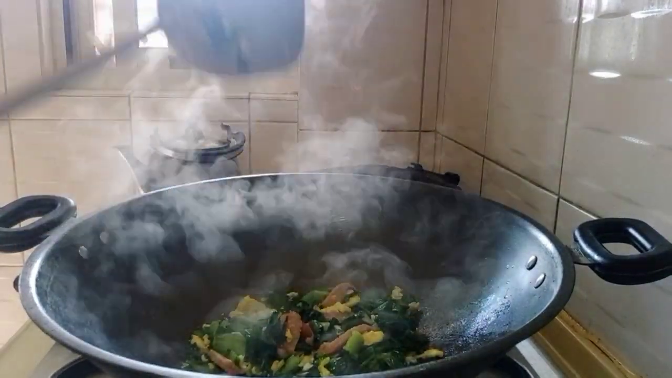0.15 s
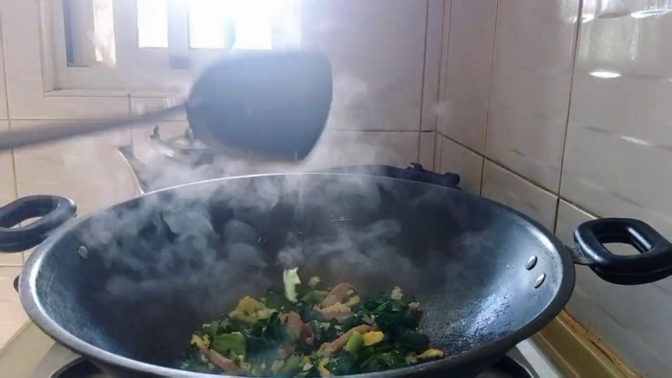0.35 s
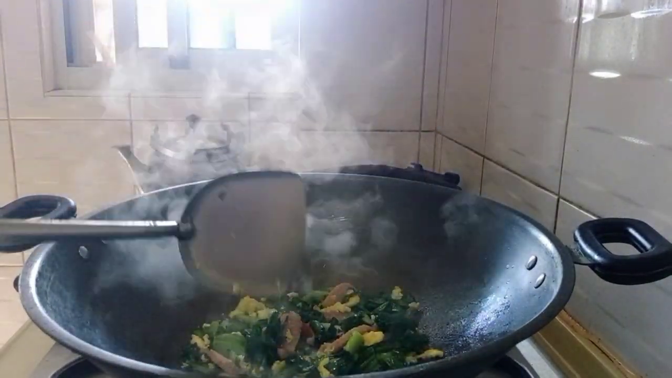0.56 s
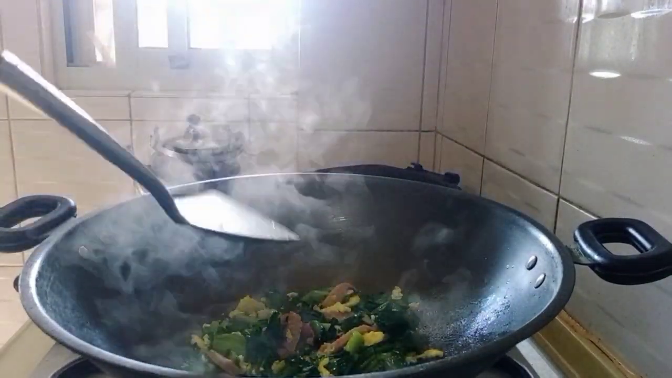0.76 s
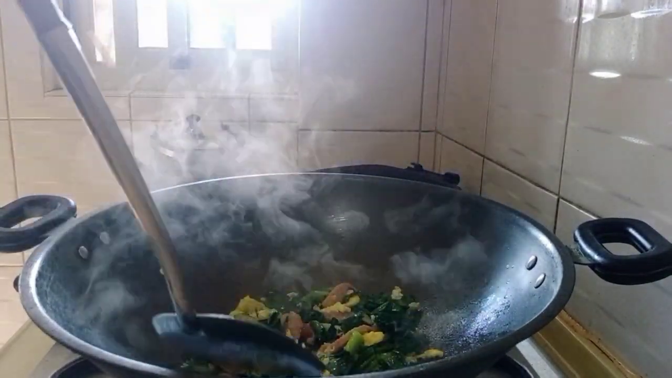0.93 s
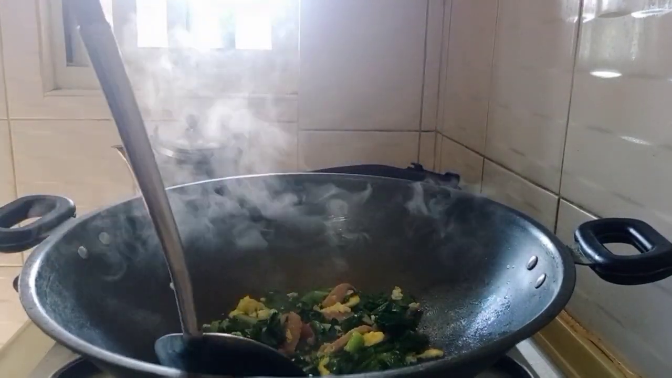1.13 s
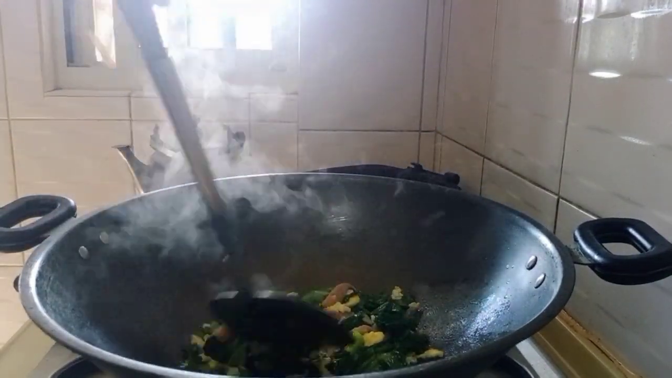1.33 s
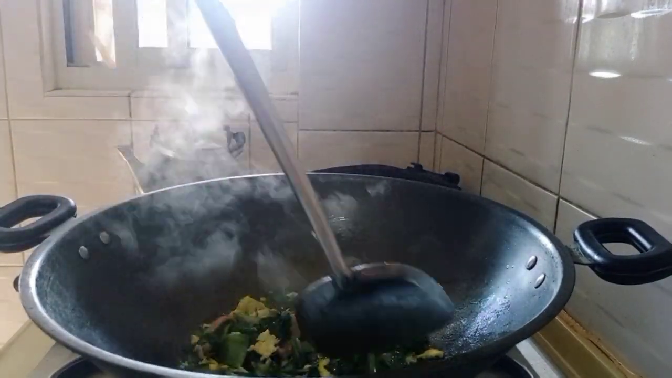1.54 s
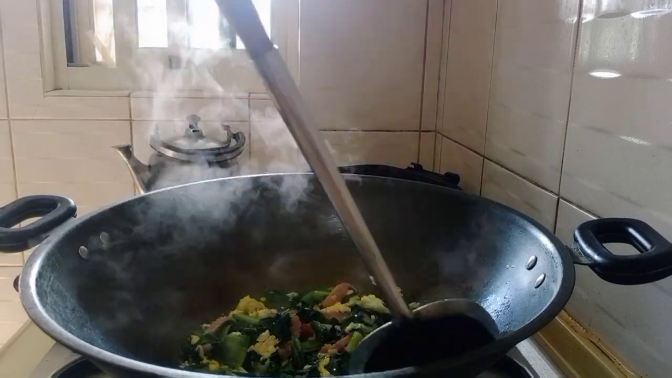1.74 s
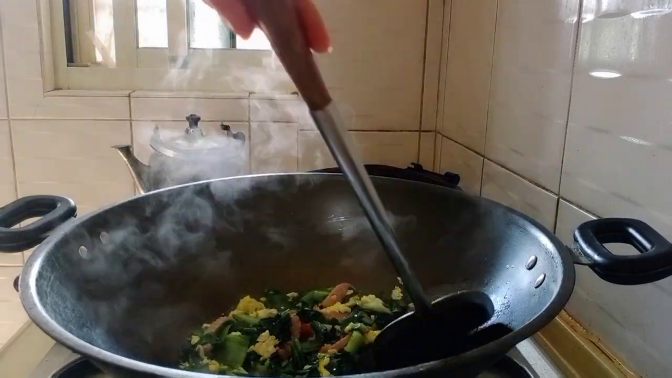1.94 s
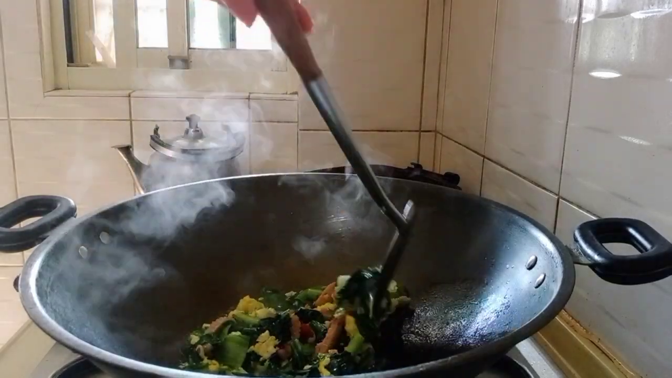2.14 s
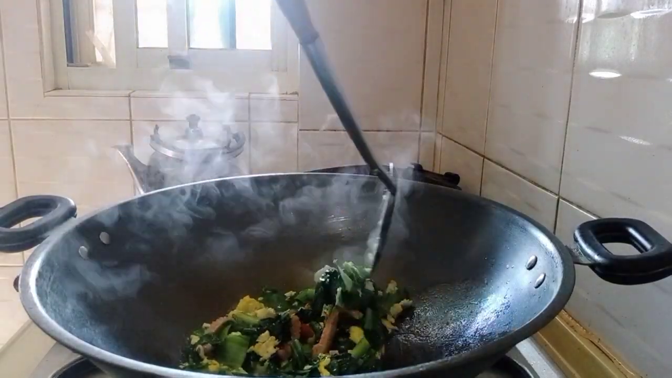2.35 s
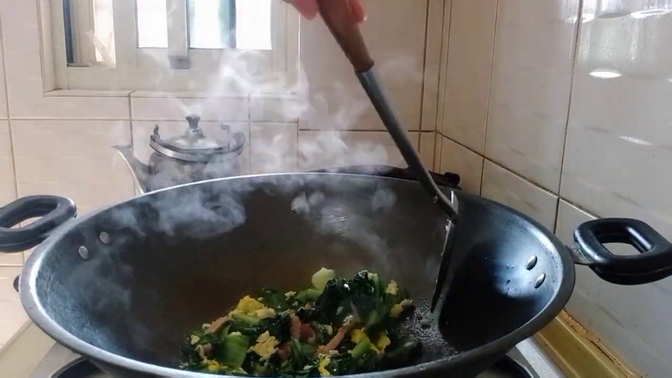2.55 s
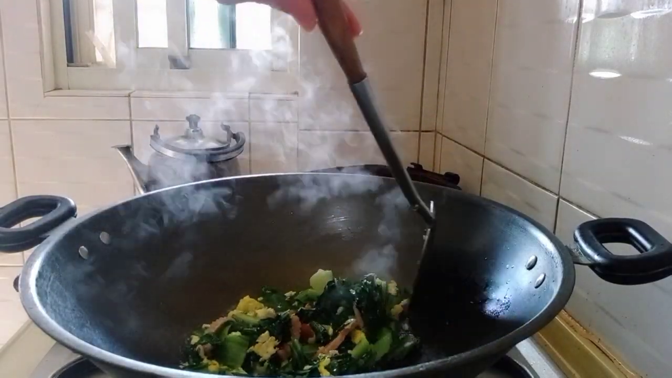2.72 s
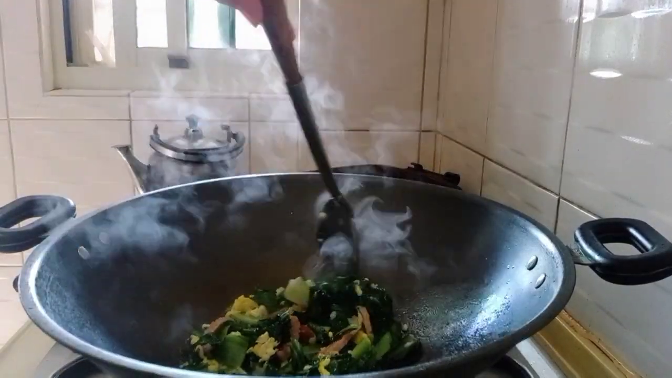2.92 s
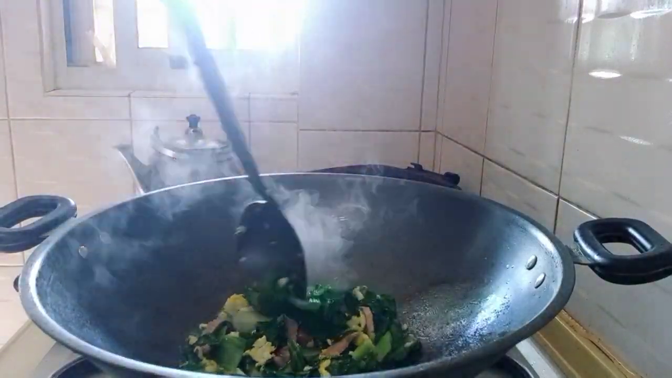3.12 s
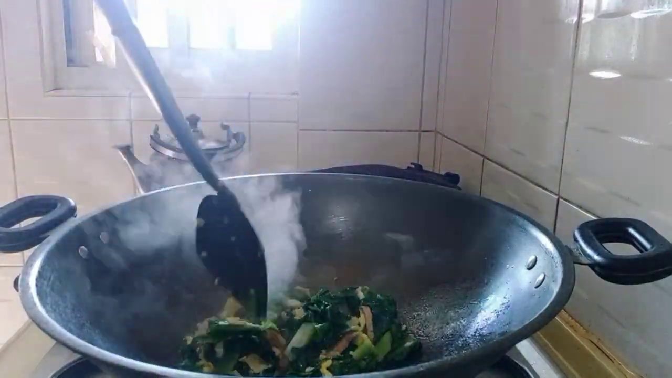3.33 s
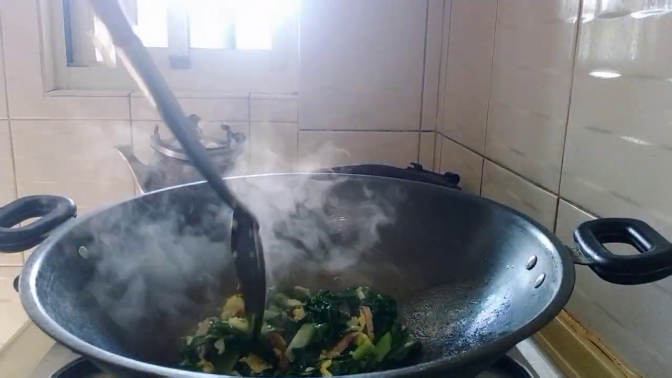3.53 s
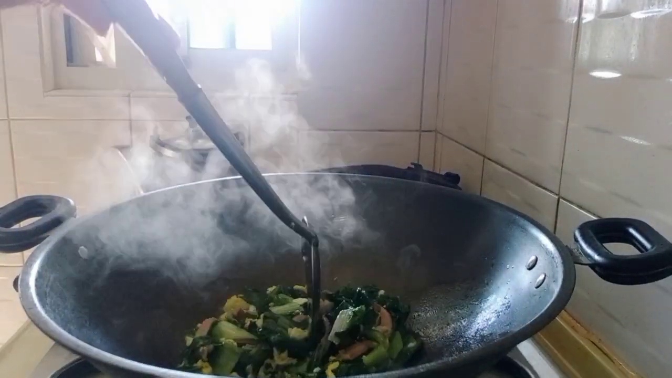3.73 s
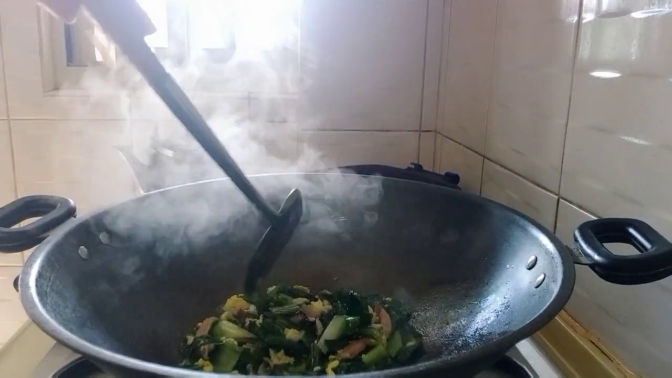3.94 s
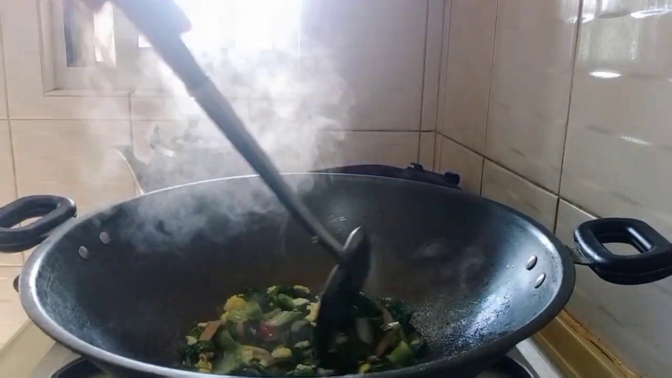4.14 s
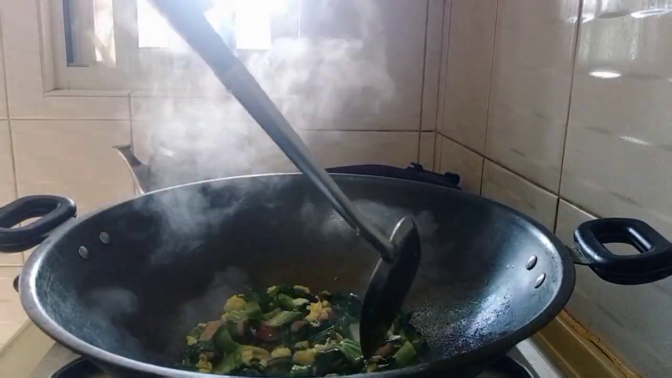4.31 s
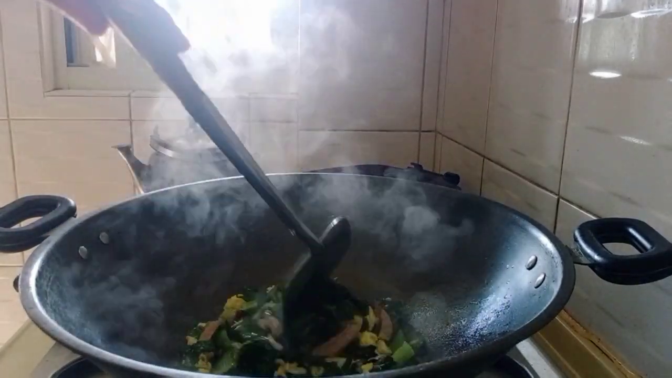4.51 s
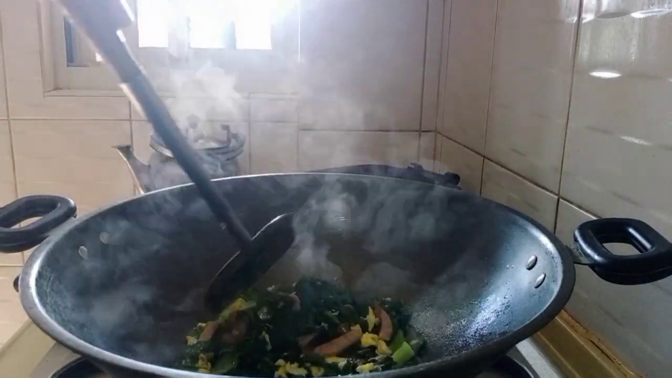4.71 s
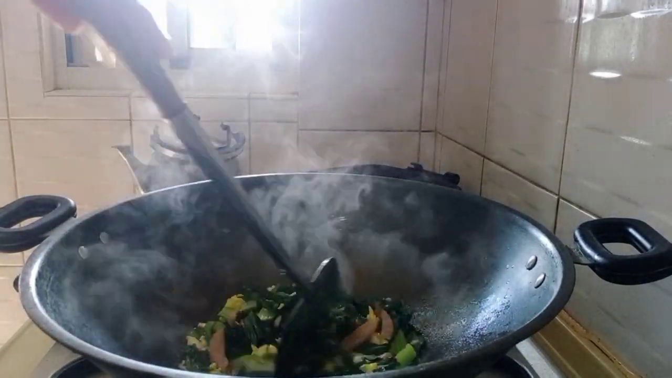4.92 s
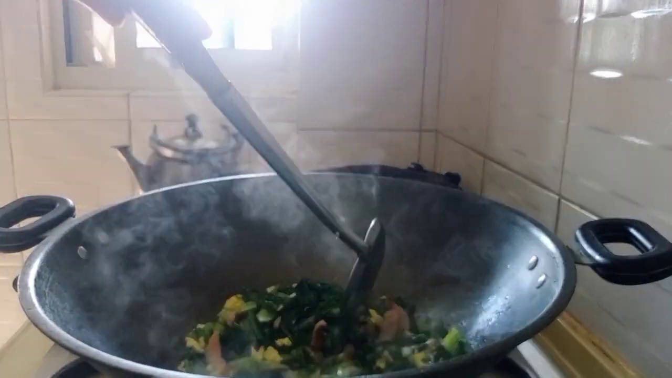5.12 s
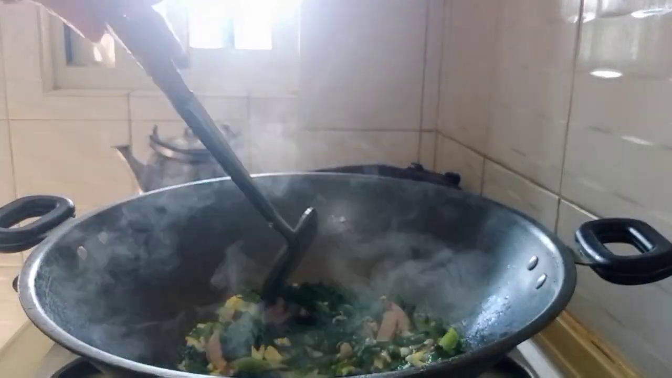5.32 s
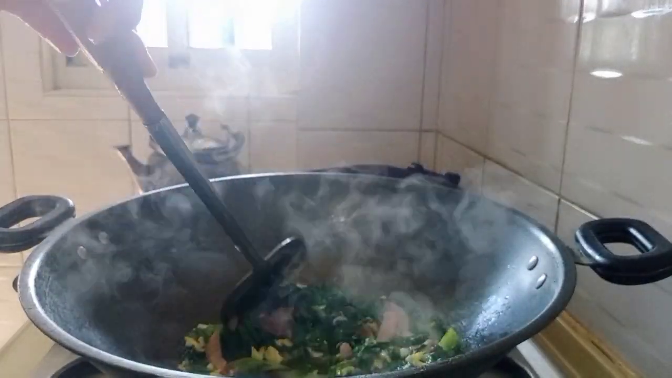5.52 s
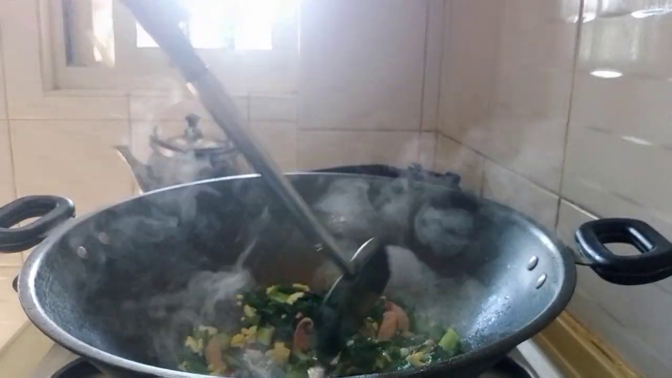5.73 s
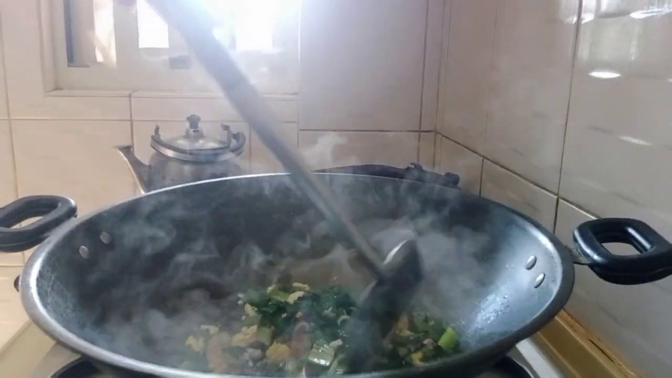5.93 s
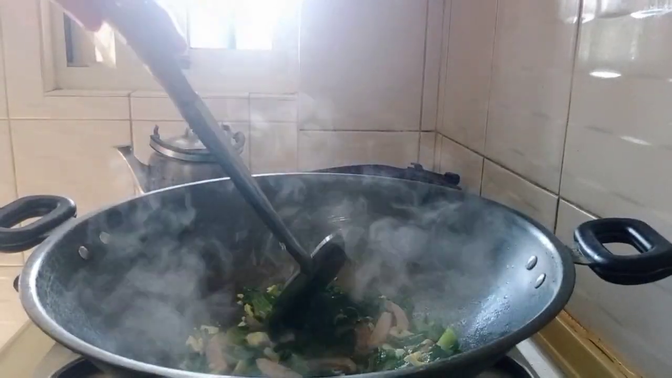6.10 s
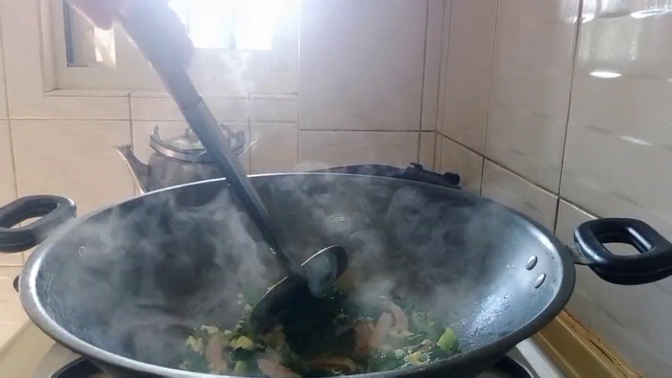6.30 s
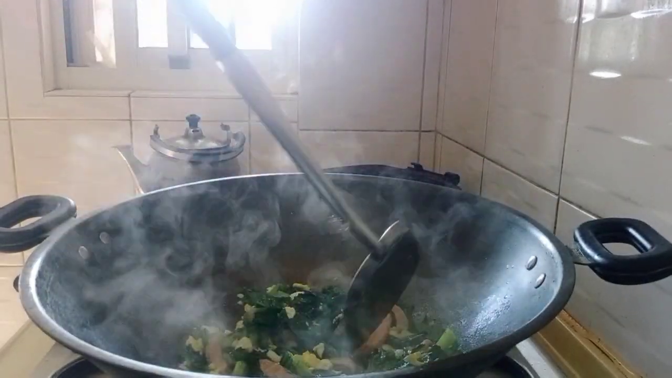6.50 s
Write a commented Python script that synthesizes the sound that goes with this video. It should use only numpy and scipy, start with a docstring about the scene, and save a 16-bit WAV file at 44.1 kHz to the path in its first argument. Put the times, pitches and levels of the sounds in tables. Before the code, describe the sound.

Vegetables sizzle steadily in a steel wok as a metal spatula clanks and scrapes the bowl, then the frying flares into a loud wet hiss.

```python
"""Vegetables fry in a steel wok, a short way from a single phone microphone in a small tiled kitchen.
Crackling noise makes the fizz and gurgle of steam bubbles, which flare up when fresh food meets the hot wall.
A steel spatula drags and knocks in three bouts, setting the bowl's modes ringing. Noise through resonances
gives brief soft rings, low from the blade in the food, higher at 5-6 s from gurgling bubbles, and two steam
whistles. Water drops spit as jumps of the fizz, and filtered noise is the faint burner."""
import sys
import numpy as np
from scipy import signal
from scipy.fft import rfft, irfft
from scipy.io import wavfile
from scipy.ndimage import uniform_filter1d, map_coordinates

SR = 44100
rng = np.random.default_rng(int(sys.argv[2]) if len(sys.argv) > 2 else 0)


def gain_from_db(level_db):
    """Convert decibel levels to linear amplitude factors (20 dB per decade)."""
    decades = np.asarray(level_db, float) / 20
    return 10 ** decades


def put_to_file(sound):
    """Save the sound as 16-bit audio at rate SR, in the file named by the first command-line argument."""
    columns = np.atleast_2d(sound).T  # one column per channel
    safe = np.clip(columns, -1, 1)
    whole_steps = np.round(safe * 32767)
    wavfile.write(sys.argv[1], SR, whole_steps.astype(np.int16))


N = 293706
TIME = np.arange(N) / SR


def level(x, db):
    """Scale to an rms level."""
    return x * gain_from_db(db) / np.sqrt(np.mean(x ** 2))


def band(x, hz, kind, order=2):
    """Butterworth filter."""
    return signal.sosfilt(signal.butter(order, hz, kind, fs=SR, output="sos"), x)


def colour(x, points):
    """Causal filter through (frequency [Hz], gain [dB]) points, from the cepstrum of the log gain."""
    hz, db = np.transpose(points)
    grid = np.maximum(np.fft.rfftfreq(2048, 1 / SR), 1)
    log_gain = np.interp(np.log(grid), np.log(hz), db) * np.log(10) / 20
    cepstrum = irfft(log_gain)
    # folding the second half onto the first gives minimum phase
    cepstrum[1:1024] *= 2
    cepstrum[1025:] = 0
    response = irfft(np.exp(rfft(cepstrum)))
    return signal.fftconvolve(x, response)[:len(x)]


def ring(x, hz, t60):
    """One mode that swells quickly, then decays; steady noise roughly keeps its level."""
    for t in (t60, 0.06 * t60):  # the slow decay, then the quick swell
        r = np.exp(-np.log(1000) / (t * SR))
        x = signal.lfilter([1 - r, 0, r - 1], [1, -2 * r * np.cos(2 * np.pi * hz / SR), r * r], x)
    return x / np.sqrt(1 - np.exp(-np.log(1000) / (t60 * SR)))


def walk(rate):
    """Random levels held 1 / rate s and slewed twice; spread near 1."""
    k = int(SR / rate)
    held = np.repeat(rng.standard_normal(N // k + 1), k)
    return 1.58 * uniform_filter1d(uniform_filter1d(held, k), k)[:N]


def crackle(share, spread_db):
    """Clicks on a share of the samples, most small and a few large, at unit rms."""
    size = gain_from_db(spread_db * rng.exponential(size=N)) * rng.standard_normal(N)
    return level(size * (rng.random(N) < share), 0)


def swell(s0, length, attack, release):
    """Rises to 1, holds for the length, dies away; all times in s."""
    after = TIME - s0
    return np.exp(np.minimum(after, 0) / attack - np.maximum(after - length, 0) / release)


def frying():
    """Tiny bubbles fizz; larger wet ones gurgle in narrow patches and shake the bowl."""
    # heat of the frying: (time [s], fizz level [dB], wet gurgle level [dB above the fizz])
    heat = [(0, -48.5, -12), (1.1, -48.5, -17), (1.9, -49, -10.5), (2.0, -50.5, -11.5), (2.7, -51, -9),
            (2.9, -46.5, 0), (3.15, -45.5, -4.5), (3.6, -48, -3.5), (4.02, -47, -6.5), (4.15, -45.5, -2.5),
            (4.6, -47.5, -8), (4.91, -47.5, -8), (5.0, -39, 0.5), (5.1, -37.5, 0), (5.2, -40, -2),
            (5.4, -43, 0.5), (5.8, -45.5, -5), (6.2, -47.5, -9), (6.66, -47.5, -8.5)]
    simmer_db = -49
    fine_lag_s = 0.15
    s, fizz_points, wet_points = np.transpose(heat)
    fizz_db, wet_db = np.interp(TIME, s, fizz_points), np.interp(TIME, s, wet_points)
    # the finest fizz and the deep gurgle gain on the fizz as the heat grows, the former a little late
    fine_db = 5 + 0.52 * (np.interp(TIME - fine_lag_s, s, fizz_points) - simmer_db)
    deep_db = -16 + 0.49 * (fizz_db - simmer_db)
    fizz = tiny_bubbles(fine_db)
    bubbles = crackle(0.3, 1.94)
    gurgle = wet_bubbles(bubbles, deep_db, wet_db)
    # bubbles leave the four lowest families still
    still = np.zeros(N)
    deep_force, wet_force = bubbles * gain_from_db(deep_db - 15), bubbles * gain_from_db(wet_db - 17.5)
    shaken = wok([still] * 4 + [deep_force] * 2 + [wet_force], unsteady_db=3.44)
    simmering = gain_from_db(fizz_db + 0.38 * walk(20)) * (bowl_echo(fizz + gurgle) + shaken)
    return simmering + spits(fizz)


def tiny_bubbles(fine_db):
    """Dense small bursts fizz; the finest, in the top treble, have a level of their own."""
    # colour of the fizz: (frequency [Hz], relative gain [dB])
    fizz_colour = [(600, -39.5), (1000, -32), (1460, -7), (2500, -18.5), (3450, -6), (4400, -5),
                   (5080, -15), (5350, -1), (6800, 2), (8000, -5.5), (9200, -18.5), (11300, -13),
                   (12600, -3), (14000, 6), (15600, 3.5)]
    split_hz = 9500
    fizz = colour(crackle(0.54, 0.79), fizz_colour)
    coarse = level(band(fizz, split_hz, "low", order=4), 0)
    fine = level(band(fizz, split_hz, "high", order=4), 0)
    return coarse + gain_from_db(fine_db) * fine


def wet_bubbles(bubbles, deep_db, wet_db):
    """Larger bubbles gurgle; each narrow slice of the spectrum comes and goes on its own."""
    # colour of the gurgle: (frequency [Hz], relative gain [dB])
    gurgle_colour = [(150, -46.5), (250, -23.5), (529, -21.5), (623, -8), (714, -27.5), (951, -23.5),
                     (1250, -9.5), (1990, -21), (2130, -9), (2370, -10.5), (3930, 6.5), (6500, 1.5),
                     (8450, -30), (14300, -120)]
    edges = np.arange(240, 6600, 110)  # Hz
    patches = np.zeros(N)
    for low, high in zip(edges, edges[1:]):
        patches += gain_from_db(6.3 * np.tanh(walk(16))) * band(bubbles, [low, high], "band")
    patches = colour(patches, gurgle_colour)
    deep = level(band(patches, 2340, "low", order=4), 0)
    wet = level(band(patches, 2160, "high", order=4), 0)
    return gain_from_db(deep_db) * deep + gain_from_db(wet_db) * wet


def bowl_echo(x):
    """The far wall of the bowl sends the mid treble back a moment later; the path shifts as the food moves."""
    echo_ms, echo_share = 1.302, 0.38
    lag = echo_ms * (1 + 0.029 * walk(5)) * SR / 1000  # samples
    mid_treble = signal.filtfilt(*signal.butter(1, [2800, 6200], "band", fs=SR), x)
    late = map_coordinates(mid_treble, [np.arange(N) - lag], order=3)
    return x + echo_share * late


def spits(fizz):
    """Drops of water spit out of the oil: the fizz jumps up for a few milliseconds."""
    # spitting drops: (time [s], level [dB before the 0.3 share])
    drops = [(0.609, -30.5), (5.3944, -36), (5.5084, -40), (5.6504, -33)]
    burst = np.zeros(N)
    for s0, db in drops:
        # the peak comes 2 ms after the listed time
        burst += gain_from_db(db) * np.exp(-np.abs(TIME - s0 - 0.002) / 0.0012)
    return 0.3 * burst * fizz


def wok(forces, unsteady_db):
    """The bowl's modes, each family driven by its own force; the moving contact wakes each mode unevenly."""
    # modes of the steel bowl: (frequency [Hz], gain [dB], decay t60 [s])
    modes = [(92.5, 1, 0.24), (147.6, -7, 0.56), (341.3, -18.5, 0.21), (438, -22, 0.095),
             (527, -10.5, 0.045), (590, -10.5, 0.15), (671, -16, 0.12), (809.7, -5.5, 0.14),
             (831.6, -8, 0.38), (1240, -15, 0.068), (1287, -11, 0.13), (1490, -18.5, 0.076),
             (1573, -18, 0.095), (1720, -18, 0.048), (1868.5, -7, 0.14), (1900, -4, 0.11),
             (2070, -17, 0.39), (3158, -9.5, 0.2), (3580, -3, 0.033), (3783, -1, 0.063), (3970, -2, 0.078),
             (4100, -10, 0.031), (4230, -4, 0.041), (4710, -11, 0.06), (5300, -10, 0.057),
             (6130, -6, 0.059), (6054, -11, 0.022), (6440, -25, 0.1), (6790, -11, 0.036),
             (7853, -14, 0.032)]
    # upper edges of the groups of modes that wake together [Hz]; one more group lies above the last
    family_top_hz = [120, 250, 720, 1000, 1700, 2600]
    out = np.zeros(N)
    for hz, db, t60 in modes:
        force = forces[np.searchsorted(family_top_hz, hz)]
        out += gain_from_db(db) * ring(force * gain_from_db(unsteady_db * walk(24.92)), hz, t60)
    return out


def spatula():
    """Knocks and a rough drag drive the bowl; the blade itself rasps."""
    # low mode families: (frequency [Hz], force that any drag gives them [dB re the drag])
    family_table = [(600, -23.5), (830, -28.5), (1250, -13.5), (1900, -21)]
    family_hz, family_db = np.transpose(family_table)
    drag, bright, families = strokes(family_hz)
    families += np.outer(gain_from_db(family_db), drag)
    blow, struck = knocks(family_hz)
    families += struck
    grit = crackle(0.3, 1.96) * gain_from_db(2.16 * walk(60))
    high_force = gain_from_db(-10.5) * drag + gain_from_db(-7) * blow
    ringing = wok([*(grit * rocking()), *(grit * families), grit * high_force], unsteady_db=2.0)
    return ringing + blade_rasp(drag, bright, blow)


def strokes(family_hz):
    """Envelopes of the blade dragged on steel; each stroke also makes the nearest mode family sing."""
    # strokes: (time [s], length [s], drag force [dB], rasp treble [dB above the usual],
    # family that sings [Hz], its force [dB])
    stroke_table = [(1.139, 0.038, -29.5, 0.5, 600, -29.5), (1.142, .025, -37, -3, 1900, -29.5),
                    (1.185, 0.025, -27, -0.5, 600, -39.5), (1.224, 0.031, -37, -5, 1900, -45),
                    (1.7, 0.06, -37.5, -7, 830, -45.5), (1.763, 0.036, -33.5, 6, 1900, -49),
                    (1.816, 0.035, -28, -3, 600, -45.5), (1.869, 0.029, -30.5, 1.5, 1250, -33.5),
                    (1.903, 0.044, -29, 3, 1250, -54), (1.97, 0.033, -44.5, 1, 1250, -46.5),
                    (2.631, 0.067, -41, 3, 830, -48), (2.721, 0.091, -29, 3, 830, -35.5),
                    (2.734, 0.032, -37.5, 7, 1900, -47.5)]
    drag, bright, families = np.zeros(N), np.zeros(N), np.zeros((len(family_hz), N))
    for s0, length, db, treble_db, hz, ring_db in stroke_table:
        shape = swell(s0, length, attack=0.006, release=0.011)
        drag += gain_from_db(db) * shape
        bright += gain_from_db(db + treble_db) * shape
        families[np.argmin(np.abs(family_hz - hz))] += gain_from_db(ring_db) * shape
    return drag, bright, families


def knocks(family_hz):
    """The blade edge strikes the bowl and chatters briefly; modes far from the favoured pitch wake less."""
    # knocks: (time [s], force [dB], chatter [ms], low modes [dB above the force], favoured pitch [Hz])
    knock_table = [(1.1249, -10, 3.9, -10.5, 1840), (1.69, -24.5, 3.6, -2, 1900),
                   (1.766, -32.5, 2, -21, 1900), (1.809, -32.5, 2, -15, 1500),
                   (2.632, -31.5, 5.5, 6.5, 1210)]
    below_db, above_db = 5.5, 28  # fall per octave on either side of the favoured pitch
    blow, families = np.zeros(N), np.zeros((len(family_hz), N))
    for s0, db, chatter_ms, low_db, hz in knock_table:
        burst = gain_from_db(db) * swell(s0, chatter_ms / 1000, attack=0.0003, release=0.0042)
        blow += burst
        octaves = np.log2(family_hz / hz)
        fall_db = np.maximum(above_db * octaves, -below_db * octaves)
        families += np.outer(gain_from_db(low_db - fall_db), burst)
    return blow, families


def rocking():
    """The bowl rocks on its stand after a shove, and trembles faintly throughout."""
    # rocks: (time [s], length [s], lower mode force [dB], upper mode force [dB])
    rock_table = [(1.145, 0.065, -41.5, -37.5), (1.27, 0.14, -55.5, -49.5), (1.69, 0.042, -51, -72),
                  (1.824, 0.063, -50.5, -60), (2.635, 0.068, -46.5, -48), (2.747, 0.12, -57.5, -68),
                  (3.27, 0.045, -62, -61), (4.754, .04, -69, -65), (4.99, 0.033, -69, -57),
                  (5.31, 0.037, -72, -69)]
    rock = gain_from_db(-81 + 3 * np.array([walk(6.3), walk(8)]))
    for s0, length, *dbs in rock_table:
        rock += np.outer(gain_from_db(dbs), swell(s0, length, attack=0.013, release=0.037))
    return rock


def blade_rasp(drag, bright, blow):
    """Dense grit rasps under the blade, its treble following an envelope of its own."""
    # colour of the rasp: (frequency [Hz], relative gain [dB])
    rasp_colour = [(1350, -91), (2300, -18), (2740, -20), (3120, -4.5), (3960, 3.5), (4640, 2), (7930, -12),
                   (9300, -33), (11400, -28), (13900, -15), (15500, -23.5)]
    treble_hz = 4600
    rasp = level(colour(crackle(0.65, 0.46), rasp_colour), 0)
    dull, sharp = band(rasp, treble_hz, "low"), band(rasp, treble_hz, "high")
    return dull * (gain_from_db(3.0) * drag + blow) + sharp * (gain_from_db(1.64) * bright + gain_from_db(-2) * blow)


def brief_notes(table, t60):
    """Each row drives one resonance with noise so that it sings for a moment."""
    out, noise = np.zeros(N), rng.standard_normal(N)
    for s0, db, hz, length in table:
        a, b = int(s0 * SR), int((s0 + length + 0.15) * SR)
        after = TIME[a:b] - s0
        out[a:b] += gain_from_db(db) * ring(noise[a:b] * (after < length), hz, t60)
    return out


def soft_rings():
    """Brief soft rings: low ones as the blade pushes the food, higher ones at 5-6 s from gurgling bubbles."""
    # soft rings: (time [s], drive level [dB], ringing mode [Hz], length [s])
    ring_table = [(2.814, -45, 634, 0.015), (2.897, -57, 795, .05), (3.0, -54, 840, 0.053),
                  (3.097, -57.5, 833, 0.088), (3.28, -57.5, 823, 0.043), (3.536, -59, 608, 0.16),
                  (3.987, -58, 864, 0.039), (4.158, -56, 873, 0.025), (4.382, -55, 818, 0.032),
                  (4.68, -62.5, 870, 0.18), (4.944, -55.5, 865, 0.05), (5.045, -48, 1228, 0.096),
                  (5.035, -54, 1890, 0.11), (5.183, -51, 620, 0.019), (5.21, -53.5, 2125, 0.17),
                  (5.37, -55, 2110, 0.13), (5.552, -55, 1354, 0.05), (5.747, -54, 1464, 0.025),
                  (5.927, -58, 2045, 0.068), (6.116, -61.5, 866, 0.084), (6.461, -61, 853, 0.033),
                  (6.59, -58, 868, 0.034)]
    return brief_notes(ring_table, t60=0.089)


def whistles():
    """Steam whistles out of a pocket in the food: noise through a high, short resonance."""
    # whistles: (time [s], drive level [dB], pitch [Hz], length [s])
    whistle_table = [(3.715, -46, 5840, 0.013), (3.75, -41, 5320, .015)]
    return brief_notes(whistle_table, t60=0.024)


def burner():
    """Low flame roar; the air under the bowl hums unsteadily on a few notes."""
    # colour of the roar: (frequency [Hz], relative gain [dB])
    roar_colour = [(15, -43), (25, 1.5), (176, -6.5), (233, -7.5), (444, -8.5), (608, -12), (729, -14),
                   (846, 7), (1030, -16.5), (1300, -4), (1690, -26), (2860, -120)]
    # notes of the air under the bowl: (frequency [Hz], width [Hz], level [dB before the 5 dB cut])
    flame_tones = [(173.5, 26, -2), (614.6, 44, -6.5), (883, 51, -5)]
    burner_db, waver_db = -63.5, 3.5
    roar = level(colour(rng.standard_normal(N), roar_colour), -2.7)
    notes = np.zeros(N)
    for hz, width, db in flame_tones:
        breath = rng.standard_normal(N) * gain_from_db(waver_db * walk(11))
        notes += level(ring(breath, hz, 3.4 / width), db - 5)
    return gain_from_db(burner_db) * (roar * gain_from_db(0.5 * walk(5.9)) + notes)


def room_tail(x):
    """The tiled walls return a short tail: noise that decays after a 4 ms gap."""
    t60_s, tail_db = 0.2, -12.5
    t = TIME[:SR // 2]
    tail = rng.standard_normal(len(t)) * np.exp(-np.log(1000) * t / t60_s) * (t > 0.004)
    tail *= gain_from_db(tail_db) / np.sqrt(np.sum(tail ** 2))
    return signal.fftconvolve(x, tail)[:N]


def scene():
    """The wok's sounds with their room tail, over the burner; one microphone feeds both channels."""
    pan = frying() + spatula() + soft_rings() + whistles()
    mono = pan + room_tail(pan) + burner()
    return np.array([mono, mono])


def top_cut(x):
    """Nothing passes above the cut-off."""
    return signal.sosfilt(signal.butter(12, 16820, fs=SR, output="sos"), x)


def record(dry):
    """The phone cuts the deep bass and the top."""
    low_hz, top_hz = 70, 15520
    no_bass = band(dry, low_hz, "high")
    mix = signal.sosfilt(signal.ellip(10, 0.2, 70, top_hz, fs=SR, output="sos"), no_bass)
    return top_cut(mix)


dry = scene()
out = record(dry)
put_to_file(out)
```